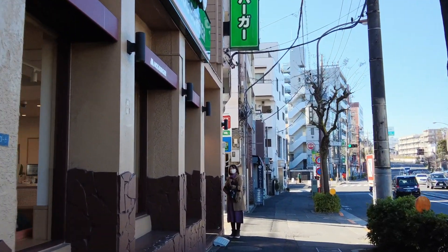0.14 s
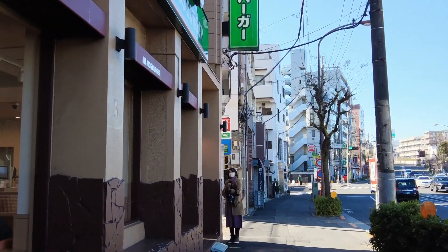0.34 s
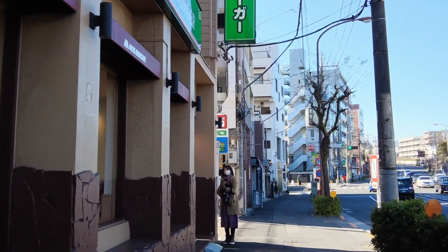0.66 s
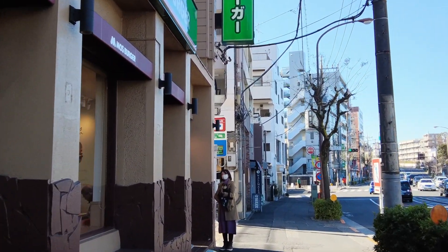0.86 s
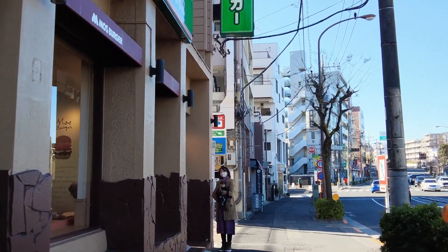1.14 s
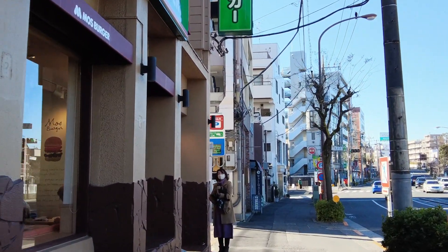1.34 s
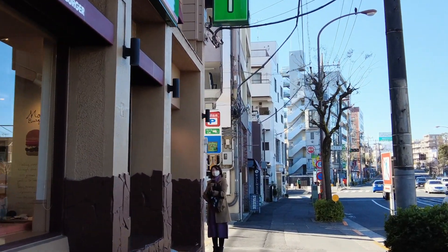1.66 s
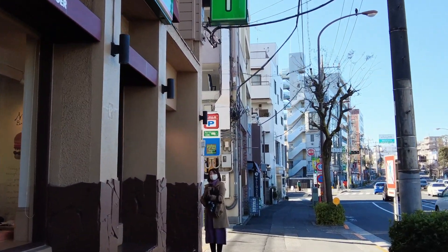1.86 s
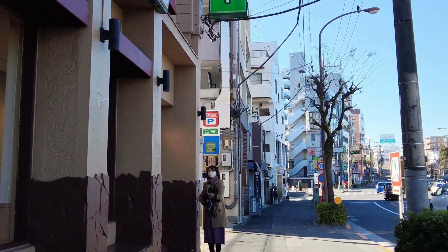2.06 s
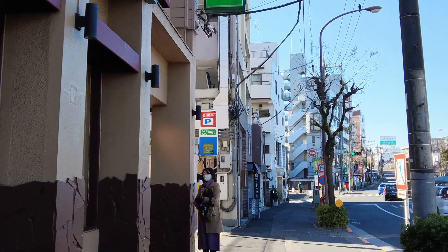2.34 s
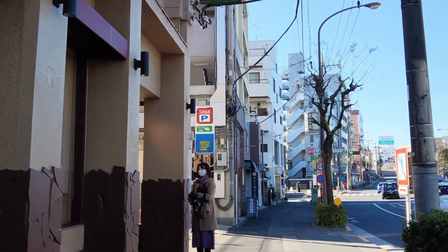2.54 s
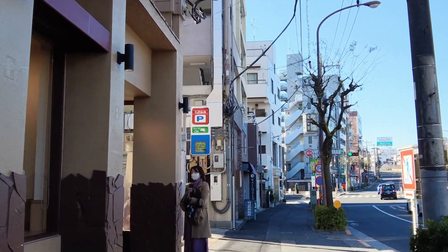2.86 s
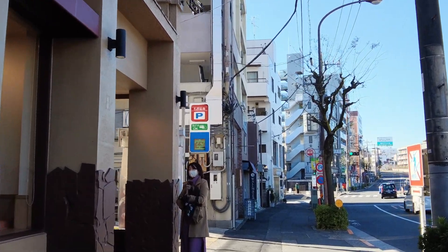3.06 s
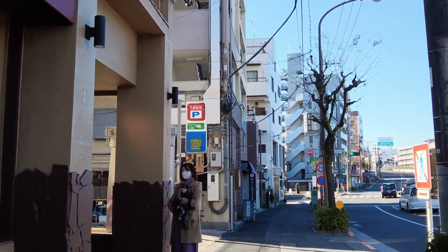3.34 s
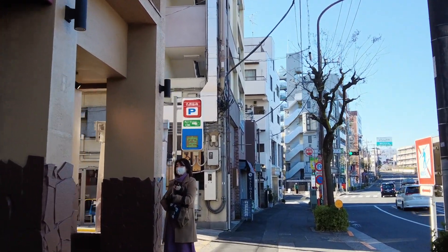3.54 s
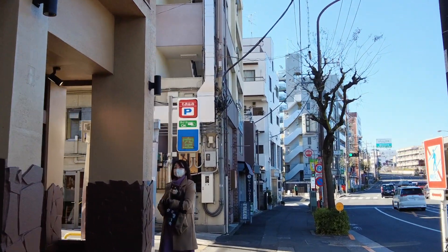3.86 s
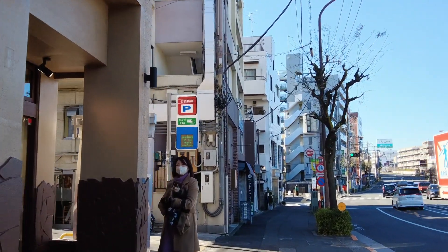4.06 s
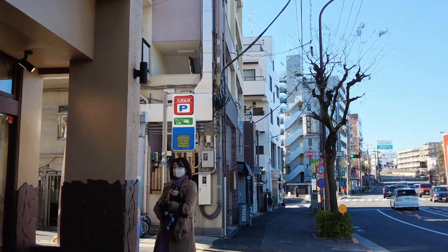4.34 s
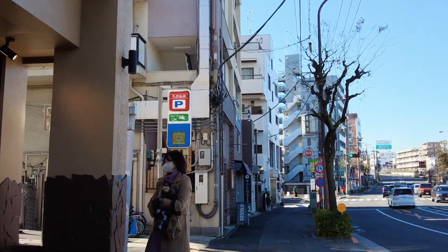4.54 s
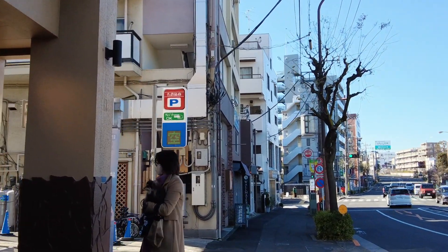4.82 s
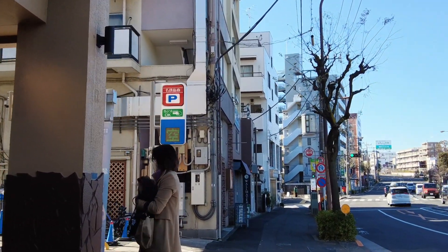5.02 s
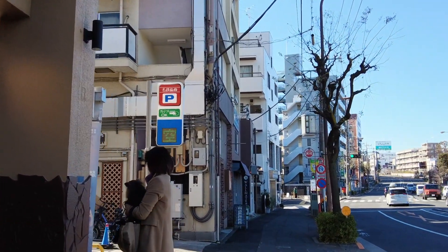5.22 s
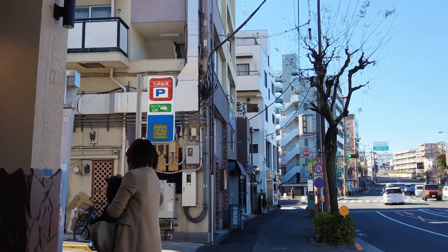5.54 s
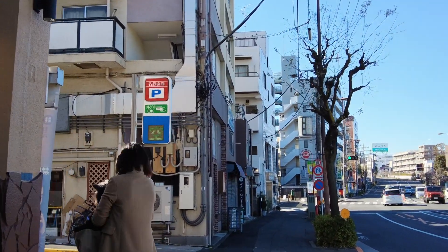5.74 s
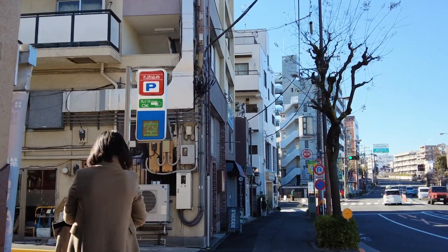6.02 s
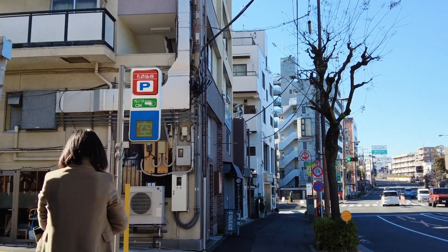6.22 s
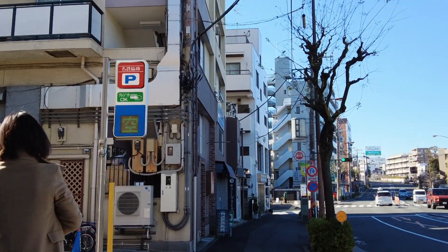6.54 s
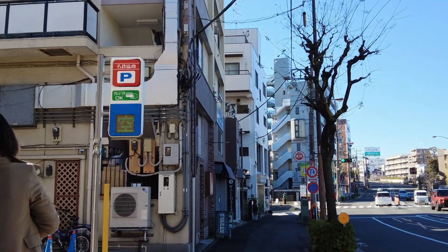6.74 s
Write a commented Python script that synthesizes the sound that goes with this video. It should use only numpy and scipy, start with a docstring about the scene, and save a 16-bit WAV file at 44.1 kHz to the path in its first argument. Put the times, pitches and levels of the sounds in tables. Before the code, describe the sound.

City traffic rumbles and hisses under droning engines, growing louder on the right as someone walks along with faintly swishing clothes.

```python
"""A city walk towards a wider road

Two engines drone, their notes swelling and fading between the house fronts. Traffic rumbles and tyres
roar and hiss, louder as the road on the right comes near. A car passes and brief tones ring out.
Clothes swish at each step. A carried pair of microphones hears it all in stereo."""
import sys
import numpy as np
from scipy import signal
from scipy.fft import rfft, irfft, next_fast_len
from scipy.io import wavfile
from scipy.ndimage import uniform_filter1d

SR = 44100
rng = np.random.default_rng(int(sys.argv[2]) if len(sys.argv) > 2 else 0)


def inscribe(sig):
    """Save sig as 16-bit PCM at rate SR to the path in sys.argv[1].

    A 1-D sig is mono; a 2-D sig holds one channel per row.
    Samples are clipped to [-1, 1] before scaling.
    """
    pcm = np.round(np.clip(np.atleast_2d(sig).T, -1, 1) * 32767)
    wavfile.write(sys.argv[1], SR, pcm.astype(np.int16))


N = 303408
FFT_SIZE = next_fast_len(N)
TIME = np.arange(N) / SR
FREQ = np.maximum(np.arange(FFT_SIZE // 2 + 1) * SR / FFT_SIZE, 1)

# The big engine pulls away, eases off and pulls again. Each row: time in seconds, cycles per second.
BIG_ENGINE_SPEED = [(0, 33.1), (.5, 34.6), (.9, 37.66), (1.35, 39), (2.1, 40.34), (3.2, 42.04),
                    (3.85, 42.17), (4.2, 43.67), (4.9, 44.68), (5.05, 44.6), (5.2, 42.1), (5.55, 39.43),
                    (5.95, 38.95), (6.3, 40.43), (6.55, 41.7), (6.88, 41.97)]
# Swells of its notes, called orders: order 2 vibrates twice per engine cycle.
# Each row: start and end in seconds, order, first and last level in dB.
ORDER_SWELLS = [(0.04, 0.504, 2, -35, -32.5), (.84, 1.05, 2, -33, -36), (1.245, 1.7, 2, -32, -33),
                (1.8, 2.117, 2, -38, -35), (2.4, 2.593, 2, -33, -29.5), (2.773, 2.945, 2, -30.5, -30),
                (3.12, 3.8, 2, -33, -32), (3.914, 4.458, 2, -19.5, -19.5), (4.63, 4.872, 2, -20, -26),
                (5.027, 5.36, 2, -29, -24), (5.48, 5.9, 2, -28.5, -28), (6.103, 6.416, 2, -24.5, -13.5),
                (6.423, 6.6, 2, -16, -20.5), (6.602, 6.92, 2, -18, -18), (0.723, 0.982, 3, -36, -32),
                (1.198, 1.7, 3, -35.5, -32), (2.1, 2.543, 3, -39, -33), (2.75, 3.548, 3, -39.5, -36),
                (4.54, 4.639, 3, -27, -30), (4.742, 5.026, 3, -35, -29), (5.172, 5.29, 3, -31, -31),
                (5.558, 5.892, 3, -27, -25.5), (6, 6.077, 3, -34, -32), (6.08, 6.28, 3, -21, -22.5),
                (6.28, 6.531, 3, -23, -15), (6.58, 6.856, 3, -19, -26.5), (4.36, 4.625, 4, -31.5, -30),
                (5.55, 5.8, 4, -33, -37), (6.1, 6.32, 4, -31, -33), (6.423, 6.875, 4, -36, -34),
                (.98, 1.12, 5, -42, -40), (3.223, 3.652, 5, -37.5, -36.5), (3.98, 4.272, 5, -35, -35.5),
                (4.55, 5.031, 5, -34, -33), (6.16, 6.3, 5, -29.5, -27), (6.442, 6.637, 5, -27, -29.5),
                (6.642, 6.92, 5, -38, -28.5)]
# The quiet level in dB of orders 2, 3, 4 and 5 between swells.
ORDER_LULL_DB = [-46.5, -49, -49.5, -49.5]
# Each row: time in seconds, pitch of order 5 in Hz, level of order 5 in dB, level of order 2 in dB.
SECOND_ENGINE = [(1.4, 227, -48, -35), (2.0, 233, -38, -37.5), (2.4, 236.5, -35.5, -32.5),
                 (2.7, 238, -45, -35), (3.3, 244, -40, -41), (3.9, 249, -34, -32.5), (4.65, 253, -37, -38),
                 (5.0, 254, -41, -39)]
# Traffic noise from low to high, before its colour is applied. Each row: pitch in Hz, level in dB among
# the houses, level in dB by the wide road, the passing car's peak in dB, time of that peak in seconds.
TRAFFIC_PARTS = [(45, -40.5, -36.5, -46, 5), (160, -41, -31, -42.5, 5.7), (320, -42.5, -37.5, -44, 3.25),
                 (660, -48.5, -31, -37, 3.78), (1338, -50, -47, -44, 3.08), (1900, -59.5, -52, -49, 3.5),
                 (2830, -62.5, -55, -57.5, 3.9), (4800, -68.5, -61.5, -63, 3.64),
                 (10000, -75.5, -64.5, -71.5, 3.2)]
# The traffic's colour, strong in the bass. Each row: frequency in Hz, gain in dB.
TRAFFIC_COLOUR = [(25, -17.5), (60, -14.5), (150, -20.5), (240, -16), (320, -21), (450, -24.5), (700, -24),
                  (1050, -27.5), (1700, -26), (2200, -32.5), (3600, -35), (5500, -37), (10000, -40.5),
                  (15700, -41.5)]
# Each row: time in seconds, nearness of the road from 0 to 1, extra roar in dB, extra tyre whine in dB.
ROAD_NEARNESS = [(0, 0, 0, -2.5), (1, .1, -1, 0), (1.8, 0.11, 0, -1), (2.15, 0.1, 0.5, 2.5),
                 (2.5, 0.22, 1, 3), (2.9, 0.35, 1, -0.5), (3.2, 0.24, -1, -4), (3.45, 0.49, -0.5, 1),
                 (4, 0.61, 0.5, 2), (4.4, 0.78, 0.5, -2.5), (5, 0.86, 1.5, -1), (5.4, 0.78, 0, 0.5),
                 (5.6, 0.78, -6, -1), (5.7, 0.81, 3, -2), (6.05, .8, 0, 0), (6.2, 1, 1, -0.5),
                 (6.45, 0.9, -4.5, -1.5), (6.65, .95, -0.5, 0), (6.88, 0.93, 1.5, 1)]
# Leaving the houses' shelter. Each row: time in seconds, share of traffic from the right from 0 to 1.
RIGHT_SHARE = [(0, 0.38), (1.8, 0.28), (2.5, 0.84), (3.5, 0.95), (6.88, 0.9)]
# The traffic's stereo image after the recorder's widening, which flips the phase just below 1.2 kHz.
# Each row: frequency in Hz, likeness of the sides from 0 to 1, right minus left phase in radians for
# the road on the right, the same for traffic ahead, left minus right level in dB.
STEREO_IMAGE = [(35, .985, -0.5, -0.5, 0.5), (60, 1, 0.5, 0, 0), (170, 1, 0.35, -0.5, 0.5),
                (336, 0.85, 0.5, -1.5, -0.5), (535, 0.6, 0.5, 0.3, 3.5), (660, 0.44, 1.9, 1.14, 1.5),
                (890, 0.74, 3, 0.5, 2), (1156, 0.63, 3, 2.5, 1), (1222, 0.64, 0.9, -6.5, -0.5),
                (1820, 0.45, -0.9, -1, -2.5), (2590, 0.08, 1.5, -15, 1.5), (3310, 0.41, 4, 3.5, -1.5),
                (4330, 0.36, 3.5, 0, 0), (6100, 0.22, 4.5, 6.5, 0)]
# Each row: peak time and length in seconds, pitch in Hz, glide in Hz per second, level in dB,
# left minus right in dB.
RINGING_TONES = [(3.22, 0.044, 920, 0, -43, 0), (4.53, .14, 413.4, -60, -34.5, 6),
                 (5.81, 0.06, 722, -43, -34.5, 0), (6.2, 0.092, 680, -31, -36.5, 9),
                 (6.27, 0.08, 460, -37, -38, 4), (6.39, .06, 640, 0, -38, 8), (5.8, 0.41, 226, 6, -31.5, 1),
                 (2.3, 0.22, 240, 5, -35.5, 0)]
# Each row: peak time and length in seconds, high hiss in dB, lower hiss in dB, left minus right in dB.
CLOTH_SWISHES = [(0.248, 0.12, -65, -62, -0.5), (0.097, .1, -70, -68, 0), (0.409, .05, -71.5, -68, -1),
                 (0.535, .045, -63, -75, 1), (0.695, .05, -63, -59.5, 1), (0.772, 0.059, -70, -69, -1),
                 (1.03, 0.056, -76, -79, -2), (1.172, 0.05, -70, -66, -2), (1.394, 0.053, -62.5, -66, 2),
                 (1.686, 0.071, -61, -58.5, 2), (1.908, .06, -70, -71, 0), (2.071, 0.05, -72, -75, -1),
                 (2.16, 0.053, -72, -74, 0), (2.654, 0.069, -60, -56, 2), (2.74, .08, -72, -65, 0),
                 (3.142, .06, -68, -62, -2), (3.35, .065, -65, -65, 3), (3.605, .055, -65, -62, 4),
                 (3.828, 0.064, -67, -63, 0), (4.078, .06, -67, -65, 1), (4.307, .06, -67, -69, -1),
                 (4.564, .07, -68, -61.5, 2), (5.094, .07, -68, -69, -2), (5.418, .06, -64, -65, 2),
                 (5.531, .06, -63, -63, 0), (6.031, .06, -66, -57.5, 0), (6.508, .06, -58, -53.5, 0)]
# Where the microphone housing rings. Each row: frequency in Hz, width in Hz, gain in dB.
HOUSING_RINGS = [(1217, 120, 4.5), (2790, 550, 5.5), (4290, 380, 5), (6240, 410, 3.5), (7700, 430, 0.5),
                 (12400, 1400, -0.5)]


def big_engine(restless_db=2.0, edge_s=0.052):
    """Four orders hum unsteadily and swell between the house fronts, with quick rises and falls."""
    sizes = np.array([from_db(db + restless_db * wander(7.6)) for db in ORDER_LULL_DB])
    for start, end, order, first_db, last_db in ORDER_SWELLS:
        fade = np.clip(np.minimum(TIME - start, end - TIME) / edge_s + .5, 0, 1)
        sizes[round(order) - 2] += fade * from_db(np.interp(TIME, [start, end], [first_db, last_db]))
    return engine_drone(over_time(BIG_ENGINE_SPEED)[0], sizes, multiples=range(2, 6))


def second_engine(fade_s=0.15):
    """Two rising notes of another engine, heard only while it is within earshot."""
    top_hz, *levels_db = over_time(SECOND_ENGINE)
    start, end = SECOND_ENGINE[0][0], SECOND_ENGINE[-1][0]
    fade = np.clip(np.minimum(TIME - start, end - TIME) / fade_s, 0, 1)
    return fade * engine_drone(top_hz, from_db(levels_db), multiples=(1, 2 / 5))


def engine_drone(hz, sizes, multiples, wobble=0.0018, waver_db=1.8, width_db=-22):
    """An uneven engine cycle makes wavering notes; bass reaches both microphones almost alike."""
    angle = 2 * np.pi * np.cumsum(hz * (1 + wobble * wander(14))) / SR
    out = 0
    for multiple, size in zip(multiples, sizes):
        phase = multiple * angle + 2 * np.pi * rng.random()
        width = from_db(width_db) * np.sqrt(multiple * hz.mean() / 80)
        side = width * np.sin(phase + 2 * np.pi * rng.random())
        note = np.sin(phase) + side * np.array([[1], [-1]])
        out = out + np.sqrt(2) * size * from_db(waver_db * wander(18)) * note
    return out


def traffic(flicker_db=1.7, band_octaves=3 / 5):
    """Flickering bands of tyre and exhaust noise, partly from ahead and partly from the right."""
    part_db, part_hz = traffic_levels(), [part[0] for part in TRAFFIC_PARTS]
    share = np.clip(over_time(RIGHT_SHARE)[0], 0, 1)
    likeness, road_phase, ahead_phase, balance_db = over_frequency(STEREO_IMAGE)
    likeness, sides = np.clip(likeness, 0, 1), np.array([[-1], [1]])
    colour = from_db(over_frequency(TRAFFIC_COLOUR)[0] - sides * balance_db / 2)
    spectra = []
    for phase in (ahead_phase, road_phase):
        noise = noise_spectra(3)
        # Both sides share one noise, phase-shifted by pitch: nearly opposite around 1 kHz, so it is wide.
        shared = np.sqrt(likeness) * noise[0] * np.exp(.5j * sides * phase)
        echoes = np.sqrt(1 - likeness) * noise[1:]
        spectra.append(colour * (shared + echoes))
    out = 0
    for hz in 28 * 2 ** (np.arange(17) * band_octaves):
        ahead, right = irfft(np.array(spectra) * band(hz, band_octaves), FFT_SIZE)[..., :N]
        # Each band blends the levels of the parts nearest in pitch.
        blend = [np.interp(np.log(hz), np.log(part_hz), row) for row in np.eye(len(part_hz))]
        db = np.dot(blend, part_db) + flicker_db * wander(9)
        out = out + from_db(db) * (np.sqrt(1 - share) * ahead + np.sqrt(share) * right)
    return out


def traffic_levels(car_reach_s=0.72):
    """Each part's level in dB: the street grows louder towards the road while one car comes and goes."""
    nearness, roar_db, whine_db = over_time(ROAD_NEARNESS)
    roar, whine = band(hz=680, octaves=0.62), band(hz=1400, octaves=0.62)
    levels = []
    for hz, shelter_db, road_db, car_db, peak_s in TRAFFIC_PARTS:
        street = from_db(shelter_db + nearness * (road_db - shelter_db))
        car = from_db(car_db) / (1 + ((TIME - peak_s) / car_reach_s) ** 2)
        extra_db = roar_db * np.interp(hz, FREQ, roar) + whine_db * np.interp(hz, FREQ, whine)
        levels.append(10 * np.log10(street ** 2 + car ** 2) + extra_db)
    return np.array(levels)


def ringing_tones():
    """Brief pure tones ring out of the roar, most of them sliding a little in pitch."""
    out = np.zeros((2, N))
    for peak_s, length, hz, glide, db, pan_db in RINGING_TONES:
        span, t, bump = swell(peak_s, length, pan_db)
        out[:, span] += bump * np.sqrt(2) * from_db(db) * np.sin(2 * np.pi * (hz + glide * t / 2) * t)
    return out


def clothes(grain_db=2.2, rustle_db=-73, uneven_db=4.5):
    """Rubbing cloth makes a grainy hiss: soft swishes over a faint, uneven rustle."""
    rub = noise_spectra(2)
    grain = from_db(grain_db * wander(300))
    high = irfft(rub * band(hz=12170, octaves=0.82), FFT_SIZE)[:, :N] * grain
    low = irfft(rub * band(hz=4280, octaves=1.22), FFT_SIZE)[:, :N] * grain
    high, low = high / high.std(), low / low.std()
    out = (high + .7 * low) * from_db(rustle_db + uneven_db * wander(11))
    for peak_s, length, high_db, low_db, pan_db in CLOTH_SWISHES:
        span, _, bump = swell(peak_s, length, pan_db)
        out[:, span] += bump * (from_db(high_db) * high[:, span] + from_db(low_db) * low[:, span])
    return out


def swell(peak_s, length, pan_db):
    """The samples around a peak, their times from it, and a soft bump placed between left and right."""
    span = slice(max(int((peak_s - 2 * length) * SR), 0), int((peak_s + 2 * length) * SR))
    t = TIME[span] - peak_s
    return span, t, np.exp(-4 * (t / length) ** 2) * from_db([[pan_db / 2], [-pan_db / 2]])


def wander(per_second):
    """A smooth random drift around zero that picks a new goal this many times a second."""
    hold = int(SR / per_second)
    steps = np.repeat(rng.standard_normal(N // hold + 1), hold)
    return uniform_filter1d(uniform_filter1d(steps, hold), hold)[:N]


def noise_spectra(count):
    """Spectra of separate white noises, each with power 1 per Hz."""
    return rfft(rng.standard_normal((count, FFT_SIZE))) * np.sqrt(SR / 2)


def band(hz, octaves):
    """A rounded filter that peaks at hz and falls to zero this many octaves away."""
    return np.cos(np.pi / 2 * np.clip(np.log2(FREQ / hz) / octaves, -1, 1))


def over_time(table):
    """Join a table's rows with straight lines, giving each column a value at every sample."""
    seconds, *columns = np.transpose(table)
    return np.array([np.interp(TIME, seconds, column) for column in columns])


def over_frequency(table):
    """Join a table's rows along a scale of octaves, giving each column a value at every frequency."""
    hz, *columns = np.transpose(table)
    return [np.interp(np.log(FREQ), np.log(hz), column) for column in columns]


def from_db(db):
    """Turn decibels into a number to multiply by."""
    return 10 ** (np.asarray(db) / 20)


def scene():
    """All the sounds of the walk, added together."""
    return big_engine() + second_engine() + traffic() + ringing_tones() + clothes()


def record(dry, top_hz=15750):
    """The microphone housing colours a few narrow ranges; the recorder cuts the highest treble."""
    lead_in = 4000  # samples that let the filters settle
    sound = np.pad(dry, ((0, 0), (lead_in, 0)), mode="reflect", reflect_type="odd")
    for hz, width, db in HOUSING_RINGS:
        ring = signal.lfilter(*signal.iirpeak(hz, hz / width, fs=SR), sound)
        sound = sound + (from_db(db) - 1) * ring
    treble_cut = signal.ellip(12, .2, 80, top_hz, fs=SR, output="sos")
    return signal.sosfilt(treble_cut, sound)[:, lead_in:]


dry = scene()
out = record(dry)
inscribe(out)
```